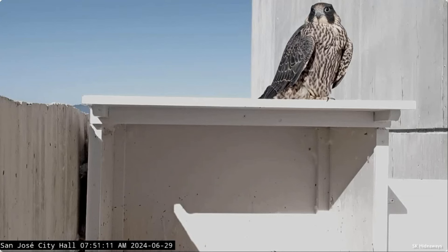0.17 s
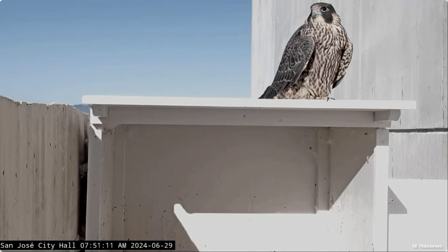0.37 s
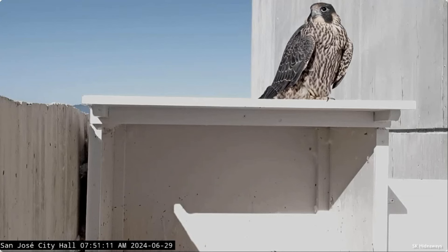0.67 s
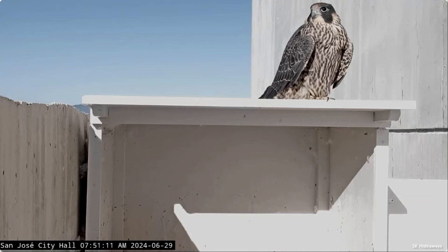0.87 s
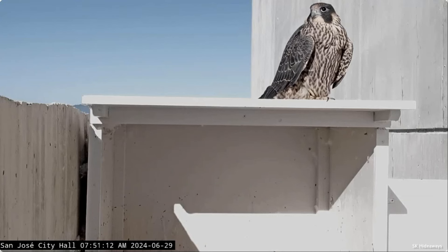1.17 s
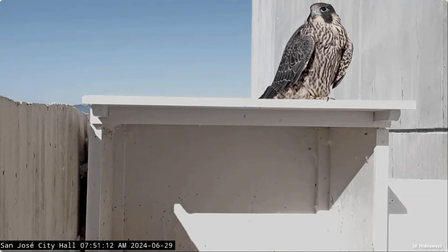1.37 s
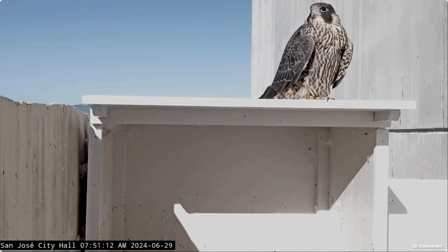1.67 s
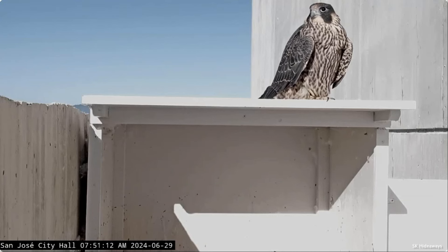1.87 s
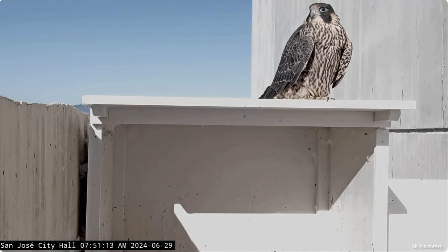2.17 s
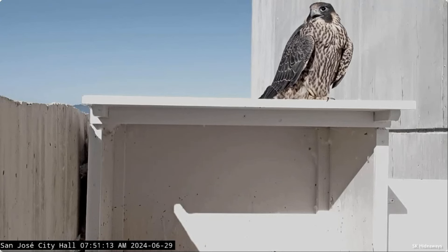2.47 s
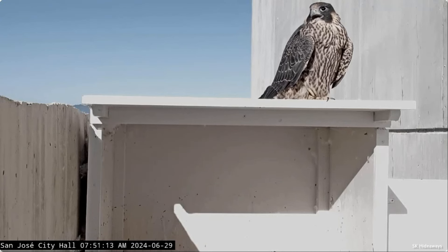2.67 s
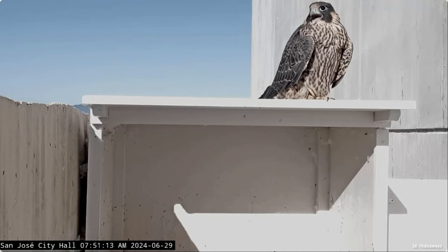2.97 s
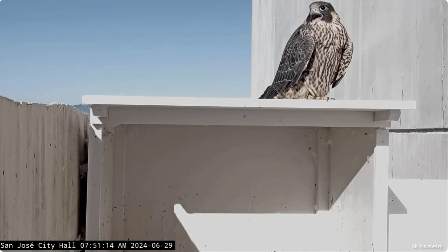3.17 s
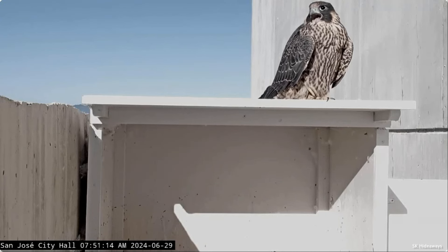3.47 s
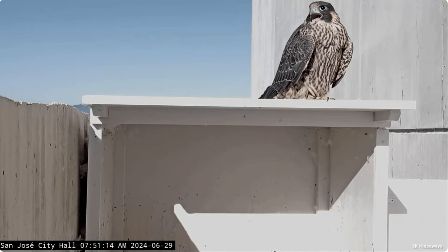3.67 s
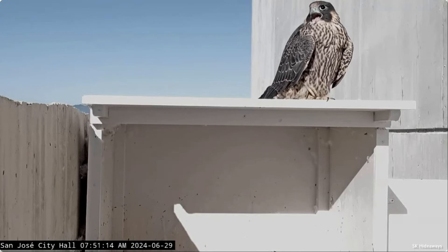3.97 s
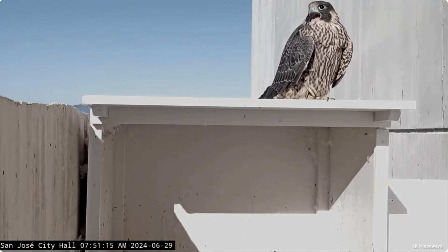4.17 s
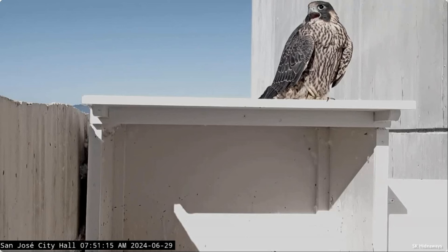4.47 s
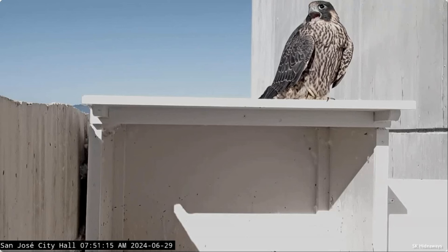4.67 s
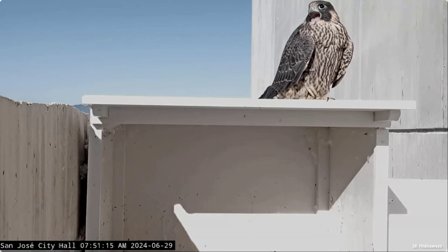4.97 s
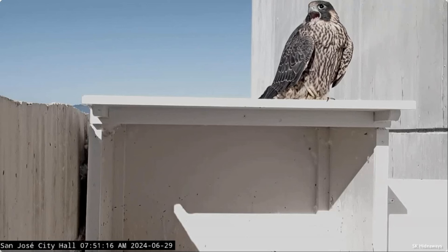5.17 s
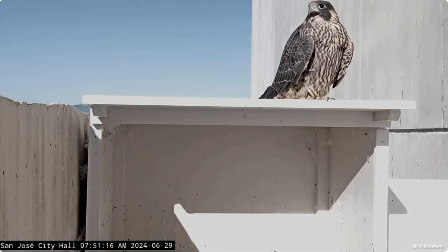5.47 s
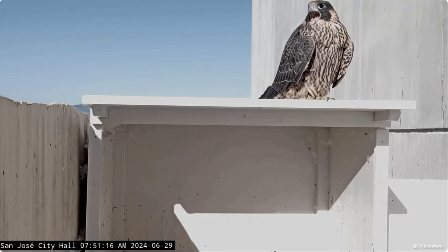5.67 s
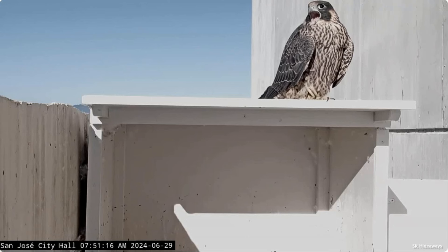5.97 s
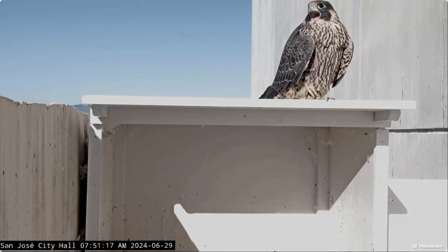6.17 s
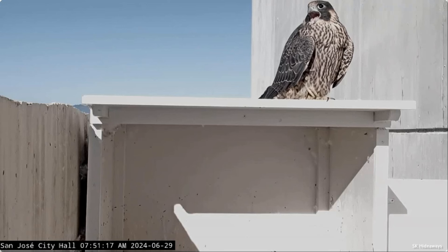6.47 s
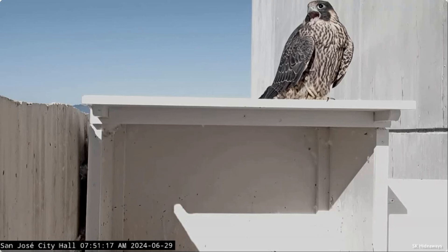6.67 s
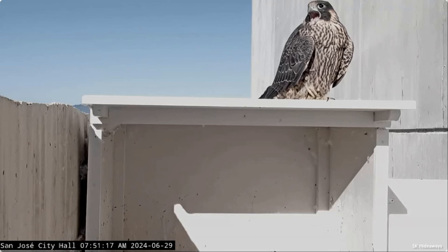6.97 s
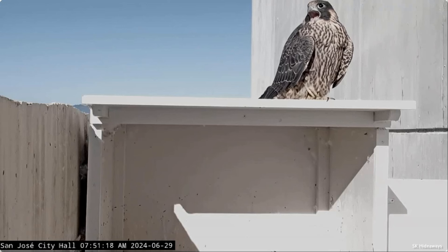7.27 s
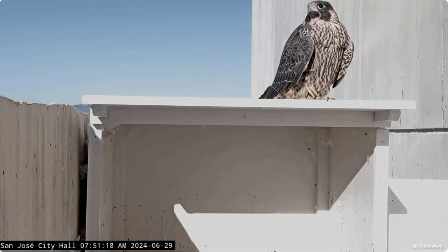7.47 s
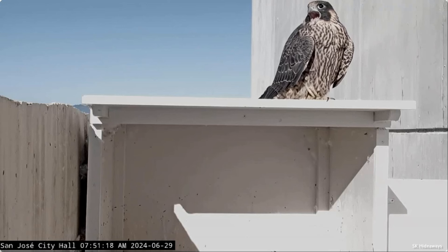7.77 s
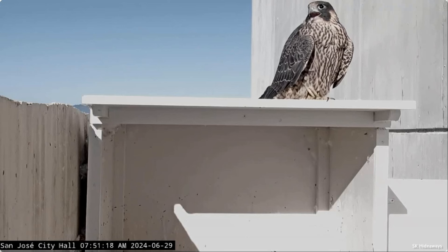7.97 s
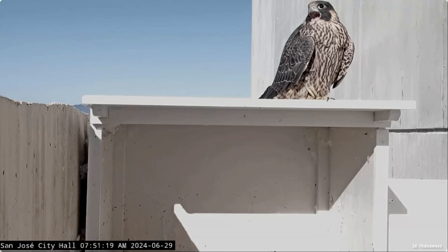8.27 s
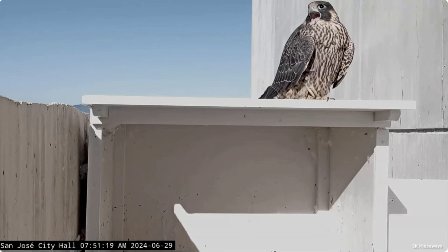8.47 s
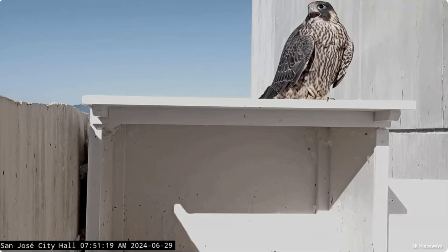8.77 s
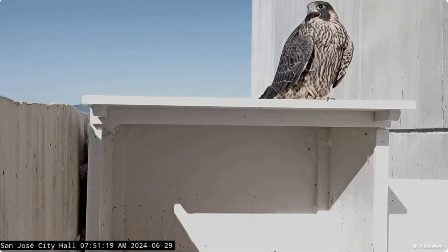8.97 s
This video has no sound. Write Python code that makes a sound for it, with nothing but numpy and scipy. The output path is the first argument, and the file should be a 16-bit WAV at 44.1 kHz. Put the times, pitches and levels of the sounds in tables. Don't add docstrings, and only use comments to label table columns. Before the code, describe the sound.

A young falcon close by screams eight hoarse, slowly rising calls in quick succession, after two seconds of gusty wind buffeting the microphone.

```python
import sys
import numpy as np
from scipy import signal
from scipy.fft import rfft, irfft, dct, next_fast_len
from scipy.io import wavfile
from scipy.ndimage import uniform_filter1d

SR = 44100
rng = np.random.default_rng(int(sys.argv[2]) if len(sys.argv) > 2 else 0)


def how_loud(loudness_db):
    steps = np.asarray(loudness_db, float) / 20
    return 10 ** steps


def materialize(psi):
    bounded = np.clip(np.atleast_2d(psi).T, -1, 1)
    quanta = np.round(bounded * 32767).astype(np.int16)
    wavfile.write(sys.argv[1], SR, quanta)


N = 401751

# (start [s], length [s], rasp level [dB], settled pitch [Hz], final pitch [Hz])
CALLS = [
    (2.32, 1.235, -19.5, 1309, 1408),
    (3.73, 0.63, -18, 1365, 1440),
    (4.506, 0.72, -16, 1365, 1473),
    (5.386, 0.67, -15.5, 1378, 1456),
    (6.242, .718, -15, 1381, 1463),
    (7.118, .695, -14.5, 1391, 1464),
    (8.003, 0.63, -14.5, 1394, 1454),
    (8.813, 0.76, -14.5, 1414, 1436),
]
# (overtone [number], rasp level [dB], reach below [share of pitch],
# reach above [share of pitch], clear line [dB])
OVERTONES = [(1, -18.5, 0.32, 0.19, -1.5), (2, -5, 0.29, 0.21, 0), (3, 0.5, 1, 0.21, 0),
             (4, -1, 1, 0.17, -14.5), (5, -9, 0.77, 0.015, -29), (6, -20, 0.58, 0.042, -38),
             (7, -22, 1, 0.018, -42.5)]
# (level re rasp in a loud call [dB], share of call strength felt [1],
# share of warm-up felt [1], change over the last breath [dB], slow waver [dB])
CLEAR_LINES = [(-20, .05, .25, 3, 1.17), (-6.5, 0.76, 1.08, 2, 0.75), (-3.5, 1, 0.98, -5, 1)]
# (time [s], drop [share of pitch], half length [s])
PITCH_SLIPS = [(3.827, 0.018, 0.039), (4.0, 0.033, .02), (4.156, .03, 0.026), (4.607, .03, .025),
               (4.7, .035, 0.026), (6.321, .025, 0.031), (6.45, 0.014, 0.028), (6.585, 0.021, .025),
               (7.416, .045, 0.023), (8.112, .035, .02), (8.21, 0.025, .02), (8.29, 0.051, .022),
               (8.927, 0.068, .022), (9.014, 0.041, 0.041)]
# (frequency [Hz], width [Hz], gain [dB])
THROAT_RESONANCES = [(1052, 150, 8), (1494, 49, -10), (1781, 370, 15.5), (1852, 100, -8.5), (2168, 130, 7),
                     (2202, 76, -9), (2483, 120, -10.5), (3030, 23, -4), (3170, 230, 1), (3503, 100, -13),
                     (3759, 180, 9.5), (4640, 87, 3.5), (4802, 180, -10.5), (5010, 93, 3),
                     (5266, 120, -9.5), (6287, 846, -24), (7200, 200, -7), (8180, 650, -5.5),
                     (8570, 250, -21.5), (9196, 96, -12.5), (9530, 350, 17.5)]
# (delay [s], level [dB])
FIRST_ECHOES = [(.0023, -15.5), (.0071, -19.5), (0.013, -16), (.018, -15)]
# (time [s], buffet level [dB])
BREEZE_LEVEL = [(0, -37), (1.6, -35.5), (2.0, -44), (3.2, -41), (4.2, -46.5), (7.8, -44), (9.11, -42.5)]
# (time [s], buffet level [dB], half length [s], rush level [dB])
GUSTS = [(.1, -33, .03, -41), (0.264, -15.5, 0.036, -36), (.36, -27, 0.047, -36.5),
         (0.563, -32, 0.061, -41), (0.683, -20, 0.018, -43), (0.788, -36, 0.035, -43),
         (.96, -28, 0.056, -38), (1.12, -33, .03, -40), (1.326, -33, 0.032, -36.5),
         (1.51, -34.5, 0.078, -45), (2.24, -32.5, 0.022, -42.5), (2.419, -27, 0.016, -39.5),
         (2.557, -31.5, .04, -45), (2.687, -37.5, 0.043, -48), (3.855, -44, 0.038, -56),
         (4.347, -45, 0.033, -50), (4.691, -45, 0.094, -51.5), (5.204, -33.5, 0.081, -42),
         (5.76, -46, .06, -44), (6.133, -40.5, .04, -52), (6.8, -45, 0.068, -47.5),
         (8.45, -43, 0.096, -44.5), (8.73, -38.5, 0.031, -53), (8.91, -34.5, 0.049, -53),
         (9.1, -30.5, 0.051, -42.5)]
# (frequency [Hz], density [dB per Hz])
BUFFET_SPECTRUM = [(8.8, -47.5), (15, -12), (32, -2), (49, 0), (65, -2), (110, -16.5), (140, -52),
                   (240, -120)]
# (frequency [Hz], density [dB per Hz])
RUSH_SPECTRUM = [(47, -45), (80, -11), (97, -4.5), (129, 2.5), (157, -8), (183, -8), (204, -11), (420, -23),
                 (550, -46.5), (920, -120)]
# (frequency [Hz], density [dB per Hz])
CITY_SPECTRUM = [(180, -41.5), (300, -25.5), (346, -3), (412, -11), (449, -9), (615, -8.5), (907, -7.5),
                 (989, -9.5), (2550, -22), (6230, -24), (9310, -24), (12100, -67), (20500, -120)]

ATTACK_DB, ATTACK_S, SWELL_DB, SWELL_S, RELEASE_DB, RELEASE_S = -32.5, 0.008, -4, 0.05, -13, 0.035
LAST_BREATH_S, LAST_RASP_DB, WAVER_DB, LOUD_DB = 0.13, -1.5, 0.5, -15
WARM_DB, WARM_S, WARM_HZ, WARM_GLIDE_S = -14, 0.41, 240.4, 0.15
FIRST_BITE_DB, FIRST_BITE_S = 7, 0.075
SCOOP_HZ, SCOOP_S, CLIMB_BEND = 130, 0.012, 0.75
HOOK_S, HOOK_DROP = 0.034, 0.16
TICK_DB, TICK_S = -39, 0.008
WALL_T60_S, WALL_DB, WALL_HZ = 0.19, -18.5, 3400
RUSH_DB, RUSH_FOLLOWS = -47.5, 0.22
CITY_DB = -54.5
BEND_DB, CEILING = -21.5, 1.3
GHOST_DB, GHOST_SHIFT_HZ = -55, 7820
FRAME, BAND, COARSE_FROM = 1536, 16, 64
STEP_DB, STEP_SCATTER_DB, TILT_DB, MASK_DB, MASK_HZ = 2, 4, 18, -7, 800


def falcon():
    t = np.arange(N) / SR
    rasp_db, clear_db, hz = effort(t)
    hz = sagging_pitch(t, hz)
    strain = np.clip((rasp_db + 34) / 14, 0.2, 1)
    shake = strain * walk(300)
    clear, rasp = syrinx(hz, clear_db, strain, shake)
    gate = sum(np.clip(np.minimum(t - c[0], c[0] + c[1] + 0.002 - t) / 0.00077, 0, 1) for c in CALLS)
    rough = how_loud(rasp_db + 0.21 * shake) * level(throat(rasp), -1.5)
    return opening_ticks(t) + gate * (clear + rough)


def effort(t):
    calls = np.array(CALLS)
    current = np.maximum(np.searchsorted(calls[:, 0], t) - 1, 0)
    start, length, db, from_hz, to_hz = calls[current].T
    since = np.clip(t - start, 0, length)
    left = length - since
    cold = np.clip(t - CALLS[0][0], 0, None)

    attack_db = ATTACK_DB * np.exp(-since / ATTACK_S) + SWELL_DB * np.exp(-since / SWELL_S)
    push_db = db + attack_db + RELEASE_DB * np.clip(1 - left / RELEASE_S, 0, 1) ** 2
    warm_db = WARM_DB * np.exp(-(cold / WARM_S) ** 1.9)
    bite_db = FIRST_BITE_DB * np.exp(-cold / FIRST_BITE_S)
    last_breath = np.exp(-left / LAST_BREATH_S)

    clear_db = []
    for re_db, follows, warm_share, last_db, waver_db in CLEAR_LINES:
        strength_db = push_db + re_db + (1 - follows) * (LOUD_DB - db)
        start_db = warm_share * warm_db + bite_db
        clear_db.append(strength_db + start_db + last_db * last_breath + waver_db * walk(10))
    rasp_db = push_db + warm_db + LAST_RASP_DB * last_breath + WAVER_DB * walk(10)

    hz = from_hz + (to_hz - from_hz) * (since / length) ** CLIMB_BEND
    hz = hz - SCOOP_HZ * np.exp(-since / SCOOP_S) - WARM_HZ * np.exp(-cold / WARM_GLIDE_S)
    return rasp_db, clear_db, hz


def sagging_pitch(t, hz):
    ends = [c[0] + c[1] for c in CALLS]
    sag = sum(np.clip((t - end) / HOOK_S + 1, 0, 1) ** 2 * (t < end + 0.05) for end in ends)
    slipped = sum(drop * np.exp(-((t - s) / half) ** 2) for s, drop, half in PITCH_SLIPS)
    return hz * (1 - HOOK_DROP * sag - slipped)


def syrinx(hz, clear_db, strain, shake):
    mean_hz = np.mean(hz)
    jitter = strain * (0.007 * walk(60) + 0.009 * walk(250))
    steady = np.exp(2j * np.pi * np.cumsum(hz) / SR)
    turn = steady * np.exp(2j * np.pi * np.cumsum(hz * jitter) / SR)
    clear, rasp = 0, 0
    for k, db, below, above, line_db in OVERTONES:
        order = int(round(k))
        flutter_db = 1.2 * strain * walk(70) + 1.2 * shake
        line_level_db = clear_db[min(order, len(clear_db)) - 1] + line_db + flutter_db
        clear = clear + how_loud(line_level_db) * np.sqrt(2) * (turn ** order).real
        rasp_level_db = db + 1.3 * walk(25) - 10 * (1 - strain) * (order == 2)
        sideband = steady ** order * uneven_cycles(below * mean_hz, above * mean_hz)
        rasp = rasp + how_loud(rasp_level_db) * sideband.real
    return clear, rasp


def uneven_cycles(below_hz, above_hz):
    size = next_fast_len(N)
    hz = np.fft.fftfreq(size, 1 / SR)
    skirt = np.exp(-(hz / np.where(hz < 0, below_hz, above_hz)) ** 2)
    return level(np.fft.ifft(np.fft.fft(rng.standard_normal(size)) * skirt)[:N], 0)


def throat(rasp):
    def gain_db(f):
        peaks = sum(db / (1 + (2 * (f - centre) / width) ** 2) for centre, width, db in THROAT_RESONANCES)
        return peaks - 30 / (1 + (f / 880) ** 30)
    return shape(rasp, gain_db)


def opening_ticks(t):
    since = t - np.array([c[0] + 0.002 for c in CALLS[1:]])[:, None]
    decay = np.sum((since > 0) * np.exp(-np.abs(since) / TICK_S), axis=0)
    breath = shape(rng.standard_normal(N), lambda f: -30 / (1 + (f / 1500) ** 4) - 30 / (1 + (7000 / f) ** 6))
    return how_loud(TICK_DB) * decay * breath


def ledge(voice):
    t = np.arange(SR // 3) / SR
    diffuse = shape(rng.standard_normal(len(t)),
                    lambda f: 3 / (1 + ((f - WALL_HZ) / 1500) ** 2) - 14 / (1 + (6000 / f) ** 8))
    walls = diffuse * 10 ** (-3 * t / WALL_T60_S)
    walls = how_loud(WALL_DB) * walls / np.sqrt(np.sum(walls ** 2))
    walls[0] = 1
    for s, db in FIRST_ECHOES:
        walls[int(s * SR)] += how_loud(db)
    return signal.fftconvolve(voice, walls)[:N] / np.sqrt(np.sum(walls ** 2))


def wind():
    t = np.arange(N) / SR
    breeze_db = np.interp(t, *np.transpose(BREEZE_LEVEL))
    s, buffet_db, half, rush_db = np.transpose(GUSTS)[:, :, None]
    gusts = np.exp(-((t - s) / half) ** 2)
    steady_rush_db = RUSH_DB + RUSH_FOLLOWS * (breeze_db + 47.5)
    buffet = np.sqrt(how_loud(2 * breeze_db) + np.sum(how_loud(2 * buffet_db) * gusts, axis=0))
    rush = np.sqrt(how_loud(2 * steady_rush_db) + np.sum(how_loud(2 * rush_db) * gusts, axis=0))
    low = buffet * how_loud(1.2 * walk(11)) * coloured(BUFFET_SPECTRUM)
    return low + rush * how_loud(0.67 * walk(15)) * coloured(RUSH_SPECTRUM)


def city():
    return how_loud(CITY_DB + 0.14 * walk(1.0)) * coloured(CITY_SPECTRUM)


def level(x, db):
    return x * how_loud(db) / np.sqrt(np.mean(np.abs(x) ** 2))


def walk(rate):
    k = max(int(SR / rate), 1)
    draws = rng.standard_normal(N // 20 + 1)[:N // k + 1]
    smooth = uniform_filter1d(uniform_filter1d(np.repeat(draws, k), k), k)[:N]
    return smooth / np.std(smooth)


def shape(x, gain_db):
    size = next_fast_len(len(x))
    hz = np.arange(size // 2 + 1) * SR / size + 1e-3
    return irfft(rfft(x, size) * how_loud(gain_db(hz)), size)[:len(x)]


def coloured(points):
    hz, db = np.transpose(points)
    noise = rng.standard_normal(N)
    return level(shape(noise, lambda f: np.interp(np.log(f), np.log(hz), db, -90, -90)), 0)


def scene():
    return (ledge(falcon()) + wind() + city())[None]


def spectral_rounding(x):
    window = np.sin(np.pi * (np.arange(2 * FRAME) + 0.5) / (2 * FRAME))
    blocks = np.pad(x, (FRAME, 2 * FRAME - N % FRAME)).reshape(-1, FRAME)
    frames = np.hstack([blocks[:-1], blocks[1:]])
    a, b, c, d = np.split(frames * window, 4, axis=1)
    lines = dct(np.hstack([-c[:, ::-1] - d, a - b[:, ::-1]]), 4, norm="ortho")

    reach = int(MASK_HZ * 2 * FRAME / SR)
    energy = lines ** 2 * (np.arange(FRAME) >= COARSE_FROM) + 1e-18
    near = np.abs(uniform_filter1d(uniform_filter1d(energy, reach), reach)) * how_loud(2 * MASK_DB)
    bands = (energy * how_loud(2 * STEP_DB) + near).reshape(len(lines), -1, BAND).mean(axis=2)
    tilt_db = TILT_DB * (np.linspace(0, 1, bands.shape[1]) - 0.2)
    scatter_db = STEP_SCATTER_DB * rng.standard_normal(bands.shape) + tilt_db
    step = np.repeat(np.sqrt(bands) * how_loud(scatter_db), BAND, axis=1)
    error = np.sign(lines) * np.floor(np.abs(lines) / step + 0.42) * step - lines
    error[:, :COARSE_FROM] = 0

    power = (np.gradient(frames, axis=1) ** 2).reshape(len(frames), 8, -1).mean(axis=2)
    error[power.max(axis=1) > 30 * power.min(axis=1)] = 0

    p, q = np.split(dct(error, 4, norm="ortho"), 2, axis=1)
    back = np.hstack([q, -q[:, ::-1], -p[:, ::-1], -p]) * window
    return x + (back[1:, :FRAME] + back[:-1, FRAME:]).ravel()[:N]


def band_limit(x):
    return signal.sosfilt(signal.butter(12, 15700, fs=SR, output="sos"), x)


def record(dry):
    sound = dry[0]
    rumble = shape(sound ** 2, lambda f: -40 / (1 + (f / 150) ** 4))
    bent = CEILING * np.tanh(sound / CEILING) + how_loud(BEND_DB) * rumble
    cut = shape(spectral_rounding(bent), lambda f: -70 / (1 + (9700 / f) ** 80))

    def middle_db(f):
        low_cut = -80 / (1 + (f / 2400) ** 20)
        high_cut = -60 / (1 + (8000 / f) ** 20)
        return low_cut + high_cut + 12 / (1 + (5000 / f) ** 20)

    middle = signal.hilbert(shape(sound, middle_db), next_fast_len(N))[:N]
    ghost = (middle * np.exp(2j * np.pi * GHOST_SHIFT_HZ * np.arange(N) / SR)).real
    mix = (cut + how_loud(GHOST_DB) * ghost)[None]
    return band_limit(mix)


dry = scene()
out = record(dry)
materialize(out)
```